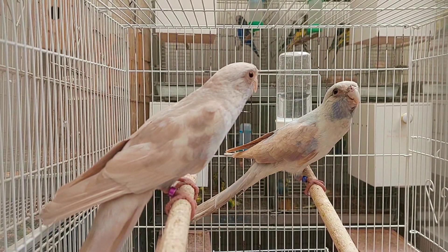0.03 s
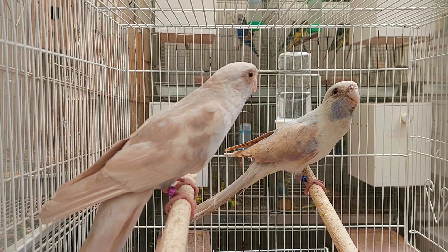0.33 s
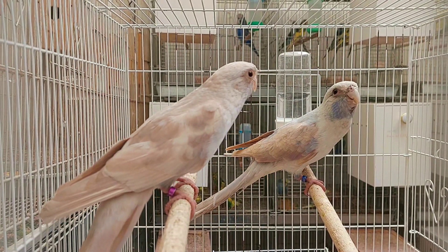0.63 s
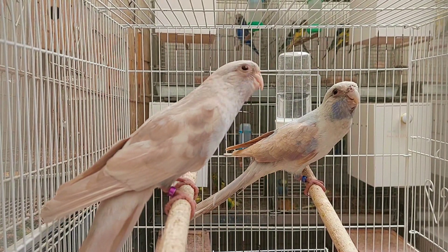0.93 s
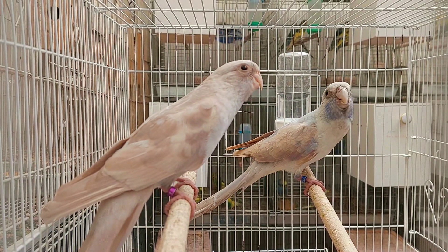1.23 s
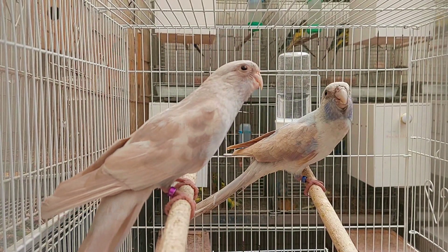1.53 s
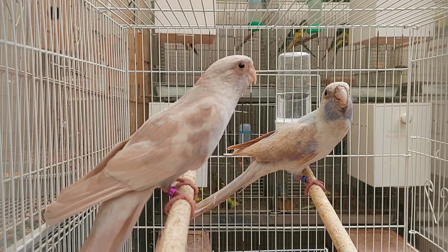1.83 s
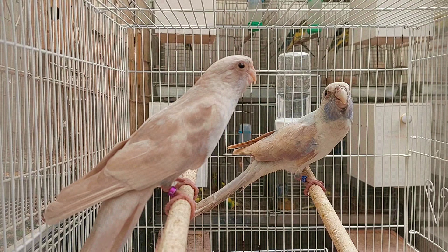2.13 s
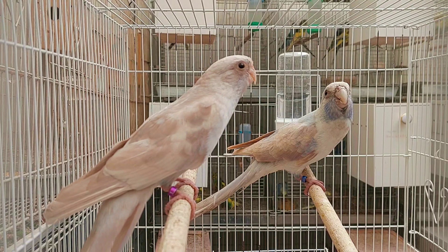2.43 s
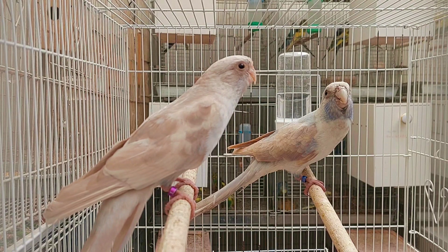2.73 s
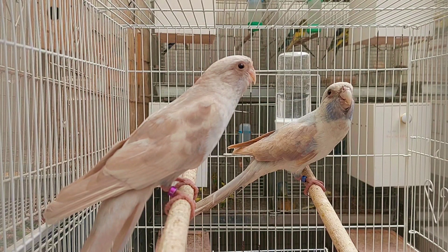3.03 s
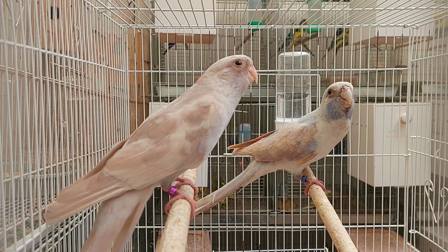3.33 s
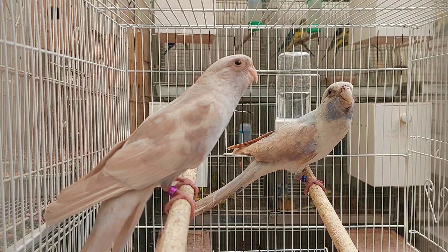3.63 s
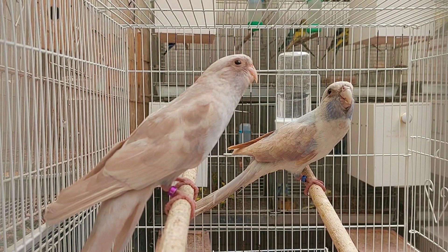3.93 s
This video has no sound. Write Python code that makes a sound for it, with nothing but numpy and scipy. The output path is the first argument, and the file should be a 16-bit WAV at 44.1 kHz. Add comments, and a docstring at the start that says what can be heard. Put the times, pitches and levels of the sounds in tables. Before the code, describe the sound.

Budgies keep up a busy, raspy chatter with short whistles, echoing slightly in a small bird room with soft hiss and hum. Then a caged bird near the microphone adds thin peeps, a brief squawk and rapid two-note chirps.

```python
"""In a small, hard-walled bird room, a flock of budgerigars rasps, whistles and chatters.
Near the end a close bird peeps, squawks, then gives a quick run of bright two-note chirps.
The notes are trembling tones from a bird's voice box; the rasps are mostly buzzing breath noise
that rings in the beak. Each call echoes off the walls. Underneath lie a hum, the room's
steady hiss and a soft low rustle of air that dies away."""
import sys
import numpy as np
from scipy import signal
from scipy.fft import rfft, irfft
from scipy.io import wavfile
from scipy.ndimage import uniform_filter1d

SR = 44100
rng = np.random.default_rng(int(sys.argv[2]) if len(sys.argv) > 2 else 0)


def int16_out(signal):
    """Quantize to a 16-bit WAV file."""
    q = np.round(np.clip(np.atleast_2d(signal).T, -1, 1) * 32767)
    wavfile.write(sys.argv[1], SR, q.astype(np.int16))


N = 176400
T = np.arange(N) / SR

# Levels are in decibels; the rasps, whistles and hiss get a further overall gain.
# How long the room echoes (frequency [Hz], time to fade by 60 dB [s])
ECHO_TIMES = [(200, 0.8), (2000, 0.22), (5000, 0.23), (12000, 0.15)]
# Tone colour of the rustling air (frequency [Hz], level [dB])
AIR_COLOUR = [(15, -35), (28, -15), (59, -2.5), (115, 0.5), (180, -10.5), (280, -5.5), (450, -5),
              (620, -13), (1000, -18.5)]
# The rustle swells and dies away (time [s], level [dB])
AIR_LEVEL = [(0, -38), (.35, -37.5), (1.2, -44.5), (1.53, -39), (1.82, -50), (2.02, -41.5), (2.5, -49),
             (3.2, -49.5), (4, -58)]
# The hum drops near the end (time [s], level [dB])
HUM_LEVEL = [(0, -47.5), (3.1, -48), (3.5, -52), (4, -56)]
# Tone colour of the room's hiss (frequency [Hz], level [dB])
HISS_COLOUR = [(150, -2), (400, -11), (900, -3), (1900, 3.5), (3000, 1.5), (5000, 3.5), (9000, -16.5),
               (15000, -20)]
# Slow drift of that hiss (time [s], level [dB])
HISS_LEVEL = [(0, 3.5), (1.6, 1), (3.2, 1.5), (4, 0)]
# The flock's whistles (start [s], length [s], level [dB], first pitch [Hz], middle pitch [Hz],
# last pitch [Hz], tremble [share of pitch])
WHISTLES = [(0, 0.07, -37.5, 1868, 1842, 1828, .004), (0.013, 0.042, -42, 2200, 2244, 2240, 0.0046),
            (0.056, 0.031, -31, 3360, 3270, 3220, 0.016), (.285, 0.041, -33, 3690, 3890, 3680, 0.053),
            (0.383, 0.042, -30.5, 3770, 3660, 3400, .045), (0.526, .036, -33, 3270, 2780, 2800, 0.041),
            (0.567, 0.032, -26.5, 4310, 4350, 4310, 0.022), (0.798, 0.03, -26, 4150, 4203, 4380, .018),
            (0.837, .05, -26.5, 4515, 4010, 3620, 0.029), (.903, 0.062, -35, 3700, 3410, 2830, 0.03),
            (1.24, 0.047, -47, 13000, 13400, 13200, .02), (1.305, 0.04, -35, 2870, 2820, 2860, 0.018),
            (1.423, 0.075, -31, 3800, 3515, 3580, 0.059), (1.492, 0.019, -35, 2760, 2610, 2580, .025),
            (1.56, 0.026, -27, 5110, 4380, 4100, 0.014), (1.579, 0.041, -25.5, 3900, 3880, 4420, 0.023),
            (1.614, .026, -40, 2400, 2390, 2390, 0.012), (1.63, 0.036, -24, 5150, 5434, 5700, 0.038),
            (1.635, 0.027, -32, 3150, 3090, 3060, 0.024), (1.649, 0.022, -27, 3940, 3670, 4060, 0.016),
            (1.671, .012, -22.5, 3910, 4970, 5240, 0.0081), (1.841, 0.089, -34, 4330, 4470, 4610, 0.046),
            (2.36, .063, -42.5, 1610, 1824, 2070, .03), (2.887, .024, -25, 3460, 3110, 3080, 0.037),
            (3.072, 0.041, -24.5, 3640, 3080, 2400, 0.043), (3.643, 0.024, -37, 3350, 3150, 3170, .035),
            (3.721, 0.043, -29, 5150, 5090, 5000, .035), (3.75, 0.04, -25.5, 3670, 3410, 3470, 0.042),
            (3.942, 0.033, -27, 5470, 5040, 4570, 0.031)]
# The flock's rasps (start [s], length [s], level [dB], beak ring [Hz], treble tilt [dB])
RASPS = [(0, 0.052, -28, 3400, -7), (0.028, 0.021, -23.5, 4490, 2), (0.109, 0.075, -33.5, 5330, 3),
         (0.269, 0.071, -31, 3870, -2), (0.33, 0.044, -28, 4740, 3.5), (0.388, 0.039, -33.5, 3600, -15),
         (0.46, 0.053, -25.5, 5390, 6.5), (0.516, 0.12, -31.5, 3250, 1), (0.593, 0.078, -26.5, 5400, 4),
         (0.683, 0.077, -29.5, 3560, 0), (0.733, 0.069, -32.5, 5410, 8), (0.821, 0.028, -25, 4040, 0.5),
         (0.886, 0.067, -31, 3440, -4.5), (0.948, 0.093, -27.5, 4200, -2), (1.017, 0.057, -26.5, 5540, 6),
         (1.085, 0.07, -27.5, 4710, 4), (1.171, 0.08, -32, 3260, -9), (1.231, 0.061, -28, 4240, -5.5),
         (1.314, 0.086, -32.5, 3010, -6), (1.366, 0.075, -34, 3630, -5), (1.453, 0.11, -37, 3030, -20),
         (1.509, 0.072, -28.5, 4800, 8), (1.582, 0.042, -38, 2870, 9), (1.666, 0.04, -30, 5850, 9.5),
         (1.812, 0.079, -35, 4460, 2), (1.961, 0.082, -35, 4470, -3), (2.129, 0.087, -33.5, 5110, 2.5),
         (2.29, 0.064, -28.5, 5590, 5), (2.361, 0.044, -34, 3690, -3), (2.455, 0.12, -35.5, 4280, -6),
         (2.615, 0.097, -26, 4520, -3), (2.707, 0.14, -35, 3730, 0), (2.837, 0.048, -28, 4230, -4),
         (2.899, 0.11, -32, 2950, -6.5), (3.034, 0.059, -27, 3200, -7), (3.131, 0.088, -28, 3970, -3),
         (3.271, 0.17, -33.5, 4260, -7.5), (3.444, 0.099, -30, 4400, -1), (3.565, 0.13, -30.5, 3340, 1.5),
         (3.713, 0.1, -32.5, 4940, -0.5), (3.809, 0.068, -26.5, 4620, 3), (3.891, 0.054, -27, 4090, -8),
         (3.953, 0.089, -22, 3880, 5.5)]
# Tone colour of the breath in a rasp (frequency [Hz], level [dB])
BREATH_COLOUR = [(400, -27.5), (1000, -18), (1400, -18.5), (1900, -2), (3000, -1), (4500, 1), (6200, -0.5),
                 (8000, -7.5), (10000, -19), (12500, -16.5), (15500, -22.5)]
# The close bird's peeps (start [s], length [s], level [dB], pitch [Hz])
PEEPS = [(2.532, 0.054, -28.5, 3580), (2.594, .021, -23.5, 2770), (2.912, 0.018, -20.5, 3490),
         (3.121, 0.017, -18.5, 3490)]
# The course of its squawk (time [s], pitch [Hz], level [dB], tremble [share of pitch])
SQUAWK = [(3.205, 2580, -51, 0.078), (3.209, 2736, -20, 0.049), (3.215, 2357, -11, 0.011),
          (3.225, 2304, -12, 0.0069), (3.23, 2460, -19, 0.024), (3.237, 2500, -24, 0.061),
          (3.243, 2620, -43, .06)]
# The squawk's harmonics, at 1, 2, 3... times its pitch (level [dB])
SQUAWK_HARMONICS = [-6, 6.5, 4.5, -3, -4, -9]
# Its chirps, a low note jumping to a high one (jump time [s], low length [s], low pitch [Hz],
# low level [dB], high length [s], high pitch [Hz], high level [dB], level of the octave above [dB],
# right minus left [dB])
CHIRPS = [(3.235, 0.0088, 5430, -15.5, 0.026, 6490, -15.5, -23, 4),
          (3.322, 0.0067, 4240, -28, 0.038, 6190, -24.5, -33.5, 17),
          (3.404, 0.0094, 3780, -24, 0.045, 6063, -19, -26.5, 3.5),
          (3.506, 0.0098, 3900, -26.5, 0.032, 5920, -18.5, -24.5, 8.5),
          (3.602, 0.013, 3806, -16.5, 0.044, 5805, -21, -26, 5.5),
          (3.704, .021, 3730, -20.5, 0.034, 5790, -19.5, -23.5, 3),
          (3.803, 0.0092, 3594, -15.5, 0.039, 5770, -23.5, -22.5, -0.5),
          (3.906, 0.013, 3667, -20.5, 0.034, 5730, -23.5, -21.5, -1.5)]
# The low note's harmonics (level [dB])
LOW_HARMONICS = [1.5, -8.5, -12.5, -17]
# How the close bird's throat and beak colour its voice (frequency [Hz], level [dB])
THROAT_COLOUR = [(2000, -1), (7500, -1), (9000, -2), (10400, -5), (11500, -6.5), (13200, 4), (15500, -11)]
# A nearly pure note: its pitch and a faint octave above (level [dB])
PURE_HARMONICS = [0, -21.5]

NOTE_FADE_S, ECHO_DB = .005, -2.5
FLOCK_LAG_S, CLOSE_LAG_S = .00045, .00036


def amp(db):
    """Turns decibels into a number to multiply by."""
    return 10 ** (np.asarray(db) / 20)


def unit(x):
    """Scales a sound to an average strength (rms) of 1."""
    return x / np.sqrt(np.mean(x ** 2) + 1e-20)


def read(points, hz):
    """Looks up a frequency in a table, spacing the octaves evenly."""
    f, value = np.transpose(points)
    return np.interp(np.log(hz + 1), np.log(f), value)


def loudness(points):
    """Turns a table of times and levels into a volume curve."""
    return amp(np.interp(T, *np.transpose(points)))


def add(mix, start_s, sound):
    """Mixes a sound in at a given time."""
    part = mix[..., max(round(start_s * SR), 0):][..., :sound.shape[-1]]
    part += sound[..., :part.shape[-1]]


def noise(n, colour_db):
    """Noise whose level at each frequency is set by the function colour_db."""
    size = max(n, 16384)
    spectrum = rfft(rng.standard_normal(size)) * amp(colour_db(np.fft.rfftfreq(size, 1 / SR)))
    return unit(irfft(spectrum, size))[:n]


def wobble(n, hz):
    """Random wavering, mostly slower than hz."""
    return noise(n, lambda f: -20 * np.log10(1 + (f / hz) ** 2))


def flutter(n, depth_db, hz):
    """A quick random shake in loudness."""
    return unit(amp(depth_db * wobble(n, hz)))


def fade(t, rise_s, fall_s):
    """Fades a note in, holds it and fades it out."""
    fade_in = np.sin(np.pi / 2 * np.clip(t / rise_s, 0, 1))
    return fade_in * np.sin(np.pi / 2 * np.clip((t[-1] - t) / fall_s, 0, 1))


def pan(right_db):
    """Makes the right side louder than the left by right_db."""
    return amp(np.array([[-right_db / 2], [right_db / 2]]))


def direct(channels, lag_s):
    """Sound straight from a bird reaches the left side a little late."""
    delay = np.exp(-2j * np.pi * np.fft.rfftfreq(N, 1 / SR) * lag_s)
    return np.array([irfft(rfft(channels[0]) * delay, N), channels[-1]])


def room(x):
    """Many echoes off the walls, different on each side; the treble dies first."""
    step, count = 12, 1800
    echoes = np.zeros((2, SR // 2 + 200))
    arrivals = 100 + step * np.arange(count) + rng.integers(0, step, (2, count))
    np.put_along_axis(echoes, arrivals, rng.choice([-1., 1.], arrivals.shape), 1)
    hz, t, bands = signal.stft(echoes, SR, nperseg=256)
    decay = amp(-60 * t / read(ECHO_TIMES, hz)[:, None])
    tail = signal.istft(bands * decay, SR, nperseg=256)[1]
    return signal.fftconvolve(x[None], tail / np.linalg.norm(tail[0]), axes=1)[:, :N]


def air_rustle(apart_hz=483):
    """Softly moving air: its deep part is shared, but above apart_hz each side hears its own."""
    air = np.array([noise(N, lambda f: read(AIR_COLOUR + [(2500, -35)], f)) for _ in range(3)])
    apart = signal.lfilter(*signal.butter(1, apart_hz, 'high', fs=SR), air[1:] - air[0])
    return loudness(AIR_LEVEL) * (air[0] + apart)


def hum(hz=239):
    """One low tone that wavers very slightly."""
    return loudness(HUM_LEVEL) * np.sqrt(2) * np.sin(2 * np.pi * hz * T + .2 * wobble(N, hz=6))


def room_hiss():
    """A steady wash of noise, separate on each side."""
    sides = np.array([noise(N, lambda f: read(HISS_COLOUR, f)) for _ in range(2)])
    return amp(-42.5) * loudness(HISS_LEVEL) * sides


def voice_box(hz, tremble, harmonics_db):
    """A bird's tone: harmonics stacked on a trembling pitch."""
    phase = 2 * np.pi * np.cumsum(hz * (1 + tremble * wobble(len(hz), hz=880))) / SR
    harmonics = (amp(db) * np.sin(k * phase) * (k * hz < SR / 2) for k, db in enumerate(harmonics_db, 1))
    return np.sqrt(2) * sum(harmonics)


def chatter(notes_per_s=42, low_hz=1454, high_hz=2712):
    """Soft, low, random notes of the farthest birds, heard only as echoes."""
    out, count = np.zeros(N), int(notes_per_s * N / SR)
    for k, (when, pitch, length, glide, level) in enumerate(rng.random((count, 5))):
        t = np.arange(0, .0341 * (.5 + length), 1 / SR)
        slide = 1 + .1545 * (2 * glide - 1) * t / t[-1]
        hz = low_hz * (high_hz / low_hz) ** pitch * slide
        note = fade(t, NOTE_FADE_S, NOTE_FADE_S) * voice_box(hz, .03, PURE_HARMONICS)
        add(out, (k + when) / notes_per_s, amp(-51.5 + 7 * level) * note)
    return room(out)


def whistles():
    """Short sliding notes; the more one trembles, the more it also warbles and scratches."""
    out = np.zeros(N)
    for start, length, db, first, middle, last, tremble in WHISTLES:
        t = np.arange(0, length, 1 / SR)
        hz = np.polyval(np.polyfit([0, .5, 1], [first, middle, last], 2), t / length)
        warble = 1 + .5 * tremble * wobble(len(t), hz=140)
        scratch = flutter(len(t), depth_db=90 * tremble, hz=220)
        note = scratch * voice_box(hz * warble, tremble, PURE_HARMONICS)
        add(out, start, amp(db) * fade(t, NOTE_FADE_S, NOTE_FADE_S) * note)
    return amp(.5) * direct([out], FLOCK_LAG_S) + amp(ECHO_DB) * room(out)


def beak_ring(x, hz, width_hz):
    """The beak rings, picking out the sound near the moving frequency hz."""
    turn = np.exp(2j * np.pi * np.cumsum(hz) / SR)
    decay = np.exp(-np.pi * width_hz / SR)
    return (turn * signal.lfilter([(1 - decay) ** 2], [1, -2 * decay, decay ** 2], x / turn)).real


def uneven(x, depth_db=3.5, patch_s=.011, patch_hz=800):
    """Lets random patches of time and frequency swell and fade."""
    bands = signal.stft(x, nperseg=256, noverlap=192)[2]
    patches = uniform_filter1d(rng.standard_normal(bands.shape), int(patch_hz * 256 / SR) + 1, axis=0)
    patches = uniform_filter1d(patches, int(patch_s * SR / 64) + 1, axis=1)
    patchy = signal.istft(bands * amp(depth_db * unit(patches)), nperseg=256, noverlap=192)[1]
    return np.std(x) * unit(patchy[:N])


def rasps(buzz_hz=254.5, treble_hz=4940, beak_share=.42):
    """Harsh calls, heard mostly as echoes: buzzing breath, a rising beak ring and a tone just under it."""
    out = np.zeros(N)
    fall_s = .0046
    for start, length, db, beak_hz, tilt_db in RASPS:
        t = np.arange(0, length + fall_s, 1 / SR)
        n = len(t)
        ring_hz = beak_hz * (1 + .0986 * (t / length - .5))
        hiss = noise(n, lambda f: read(BREATH_COLOUR, f)
                     + tilt_db * np.tanh(2 * np.log((f + 1) / treble_hz)) / 2)
        breath = noise(n, lambda f: read(BREATH_COLOUR, f))
        ring = unit(beak_ring(breath, ring_hz, width_hz=1530))
        warble = 1 + .13 * wobble(n, hz=45)
        tone = voice_box(.88 * ring_hz * warble, .025, [0])
        buzz_rate = buzz_hz * (1 + .284 * wobble(n, hz=76.5))
        buzz = 1 + .73 * np.sin(2 * np.pi * np.cumsum(buzz_rate) / SR)
        call = buzz * (np.sqrt(1 - beak_share) * hiss + np.sqrt(beak_share) * ring + amp(-9) * tone)
        add(out, start, amp(db) * fade(t, .013, fall_s) * unit(call))
    out = uneven(out)
    return pan(right_db=1) * (amp(-5) * direct([out], FLOCK_LAG_S) + amp(2.5) * room(out))


def peeps():
    """The close bird's thin, nearly pure notes, which swell and stop."""
    out = np.zeros(N)
    for start, length, db, hz in PEEPS:
        t = np.arange(0, length, 1 / SR)
        note = voice_box(np.full(len(t), hz), .012, PURE_HARMONICS)
        add(out, start, amp(db) * fade(t, .43 * length, NOTE_FADE_S) * note)
    return direct([out], CLOSE_LAG_S) + amp(ECHO_DB) * room(out)


def squawk():
    """One short, fluttering cry with strong harmonics, roughest at its ends."""
    out = np.zeros((2, N))
    times, *curves = np.transpose(SQUAWK)
    t = np.arange(times[0], times[-1], 1 / SR)
    hz, db, tremble = (np.interp(t, times, curve) for curve in curves)
    cry = flutter(len(t), depth_db=2.5, hz=700) * unit(voice_box(hz, tremble, SQUAWK_HARMONICS))
    add(out, times[0], pan(right_db=4) * amp(db) * cry)
    return out


def chirps(low_fall_s=.002, scoop_s=.00315):
    """Each chirp rises on a rough low note, then jumps to a clean high one whose pitch arches."""
    out = np.zeros((2, N))
    for jump, low_s, low_hz, low_db, high_s, high_hz, high_db, octave_db, right_db in CHIRPS:
        t = np.arange(0, low_s + low_fall_s / 2, 1 / SR)
        rise = 1 + .15 * (t / low_s - .5)
        low = fade(t, .45 * low_s, low_fall_s) * voice_box(low_hz * rise, .033, LOW_HARMONICS)
        add(out, jump - low_s, pan(right_db) * amp(low_db) * low)
        t = np.arange(0, high_s, 1 / SR)
        arch = 1 - .069 * (t / high_s - .595) ** 2
        scoop = .086 * np.exp(-t / scoop_s)  # the note slides up from below
        high = voice_box(high_hz * (arch - scoop), .012, [high_db, octave_db])
        high *= flutter(len(t), depth_db=2.5, hz=260)
        add(out, jump, pan(right_db) * fade(t, rise_s=.0079, fall_s=.018) * high)
    return out


def close_bird():
    """The squawk and chirps pass through the bird's throat and beak, then out into the room."""
    throat = amp(read(THROAT_COLOUR, np.fft.rfftfreq(N, 1 / SR)))
    song = irfft(rfft(squawk() + chirps()) * throat, N)
    return direct(song, CLOSE_LAG_S) + amp(ECHO_DB) * room(song.mean(0))


def scene():
    """The flock and the close bird over the background."""
    birds = rasps() + whistles() + chatter() + peeps() + close_bird()
    return birds + pan(right_db=1) * (air_rustle() + hum() + room_hiss())


def record(dry):
    """Cuts away the very highest treble."""
    low_pass = signal.firwin(511, 15950, window=("kaiser", 9), fs=SR)
    return signal.oaconvolve(dry, low_pass[None], "same")


dry = scene()
out = record(dry)
int16_out(out)
```